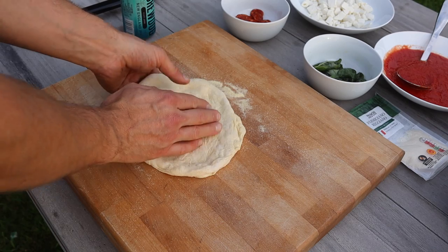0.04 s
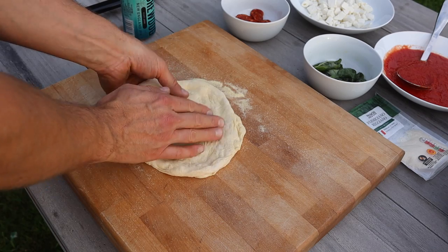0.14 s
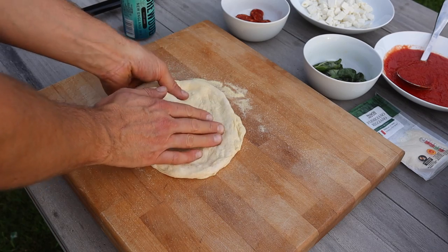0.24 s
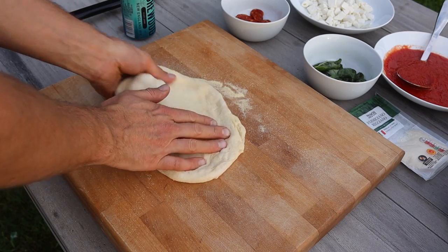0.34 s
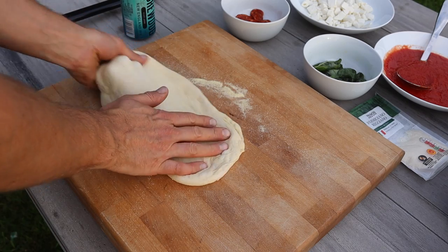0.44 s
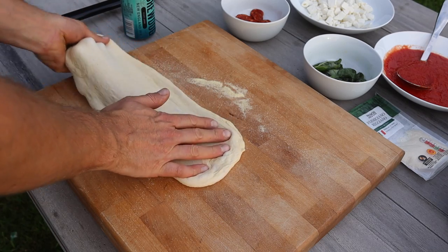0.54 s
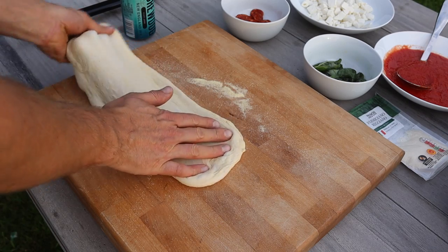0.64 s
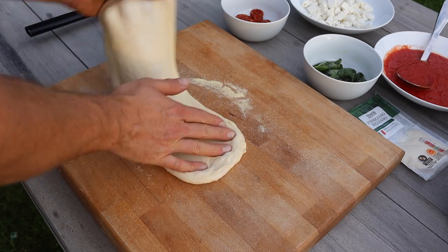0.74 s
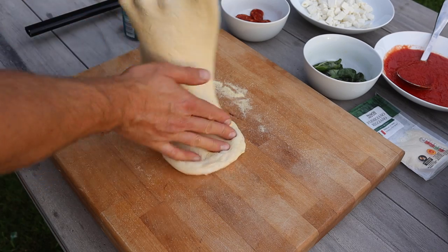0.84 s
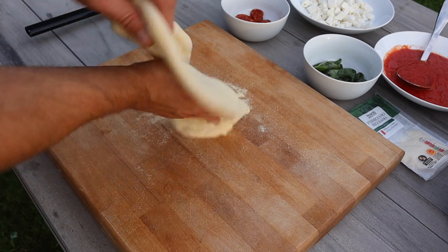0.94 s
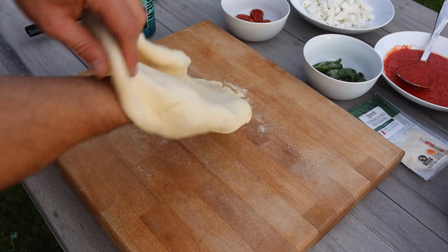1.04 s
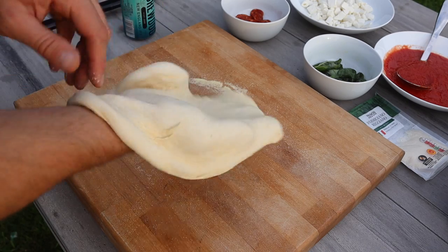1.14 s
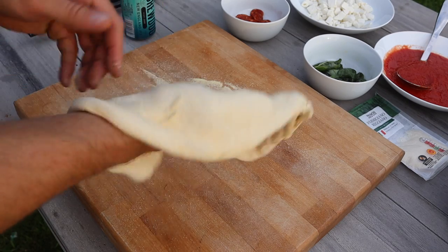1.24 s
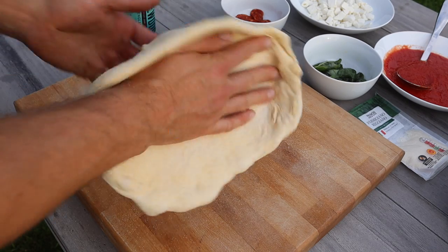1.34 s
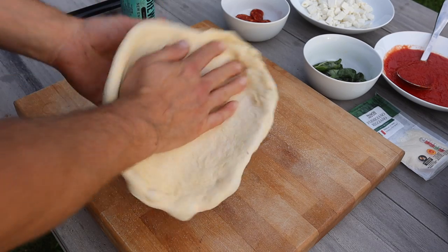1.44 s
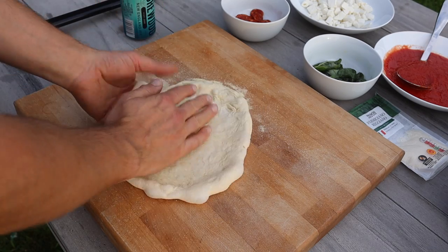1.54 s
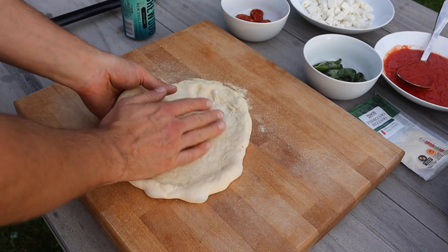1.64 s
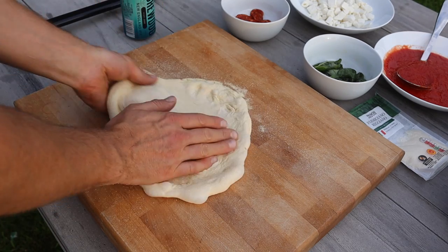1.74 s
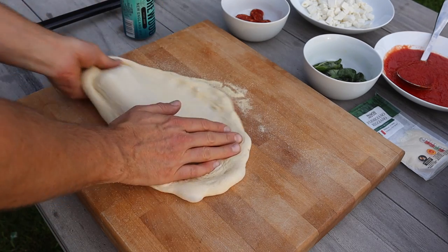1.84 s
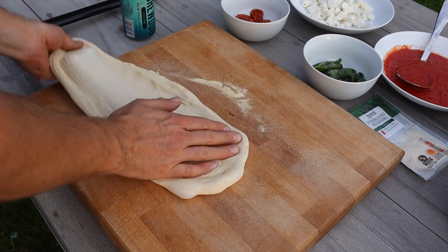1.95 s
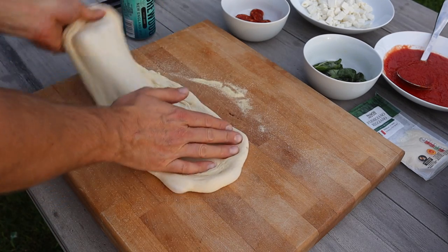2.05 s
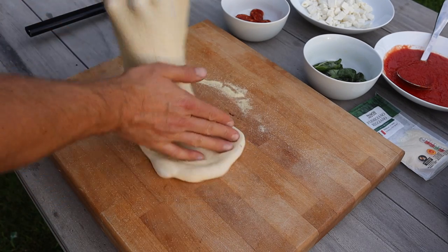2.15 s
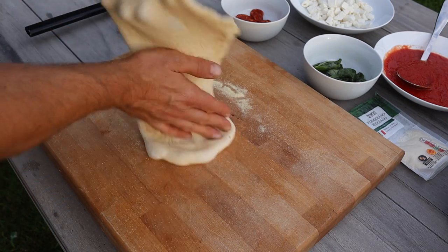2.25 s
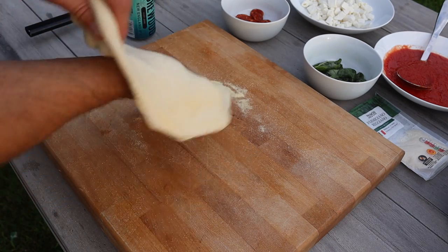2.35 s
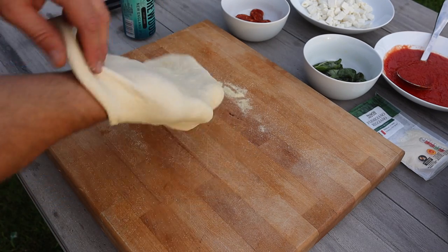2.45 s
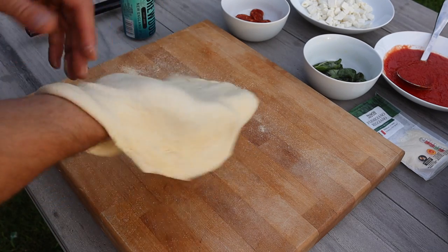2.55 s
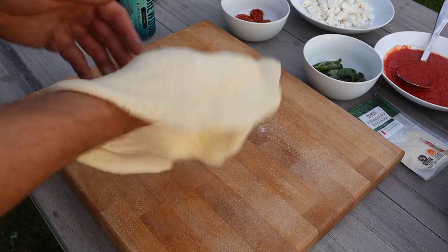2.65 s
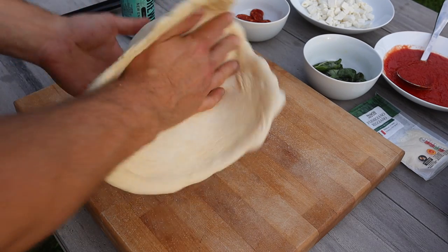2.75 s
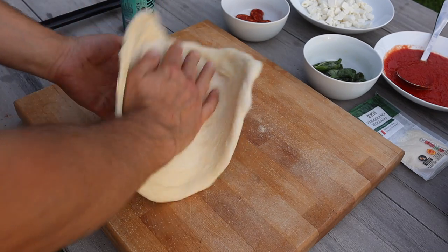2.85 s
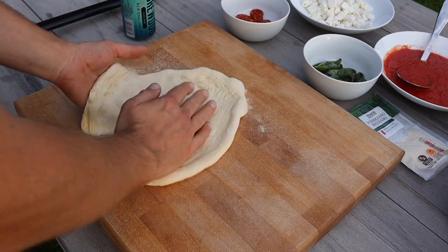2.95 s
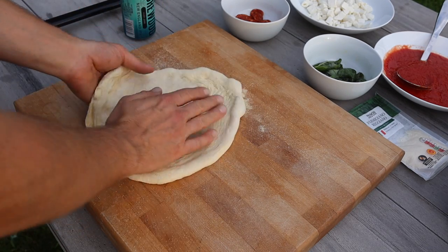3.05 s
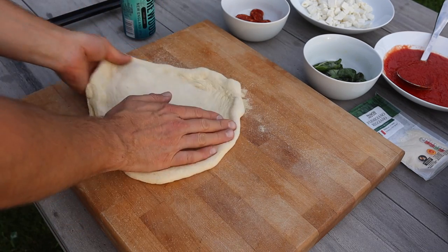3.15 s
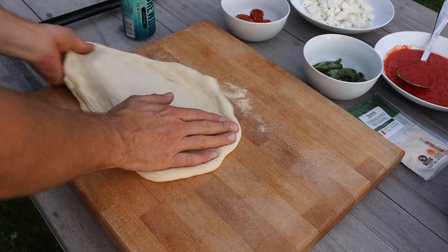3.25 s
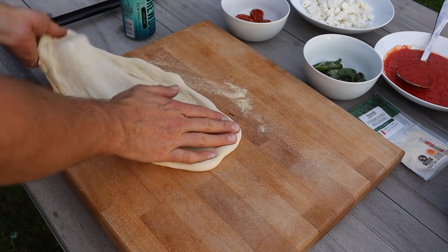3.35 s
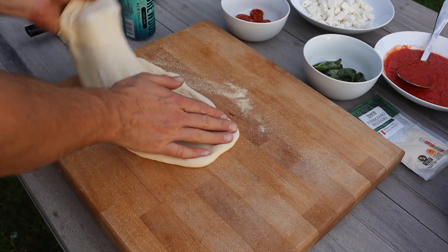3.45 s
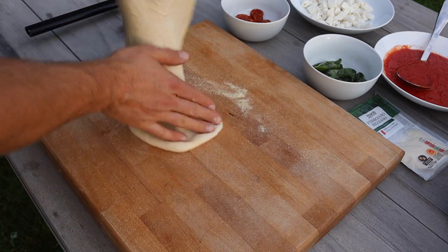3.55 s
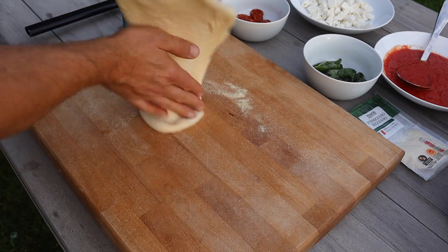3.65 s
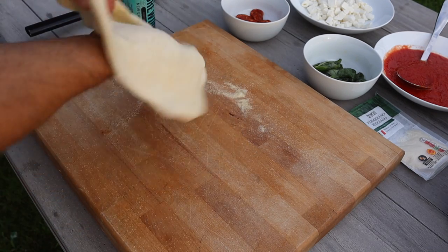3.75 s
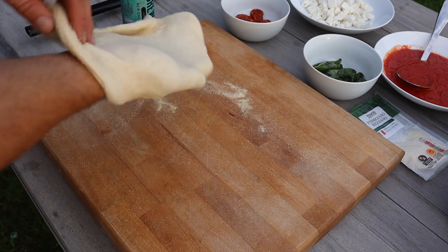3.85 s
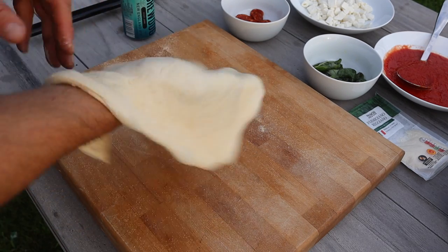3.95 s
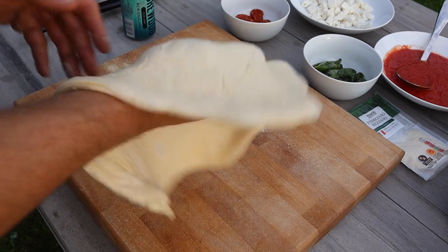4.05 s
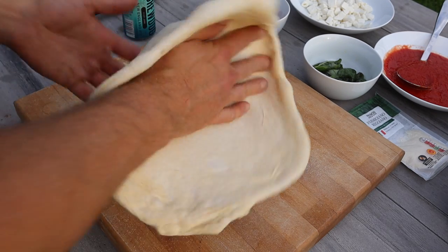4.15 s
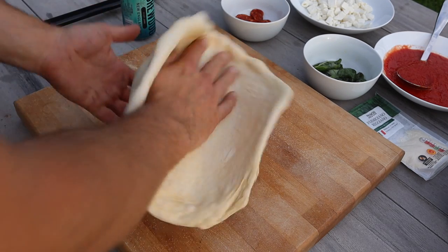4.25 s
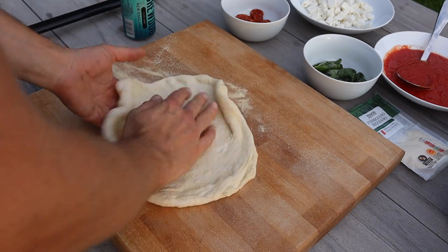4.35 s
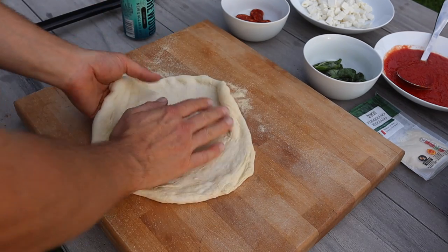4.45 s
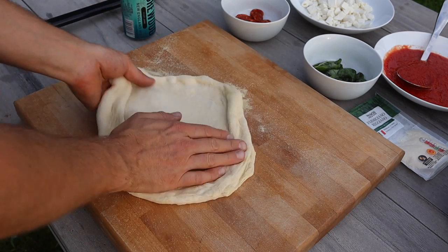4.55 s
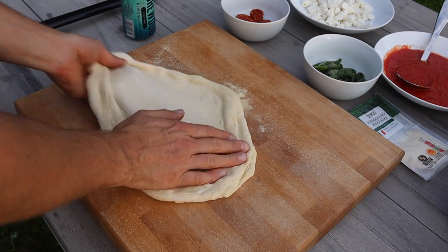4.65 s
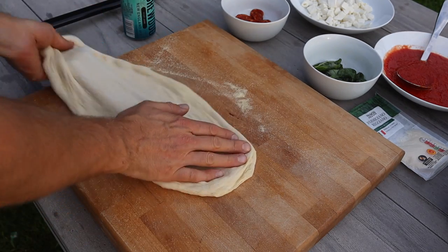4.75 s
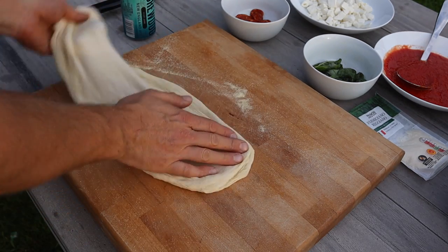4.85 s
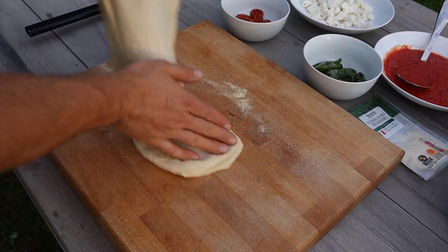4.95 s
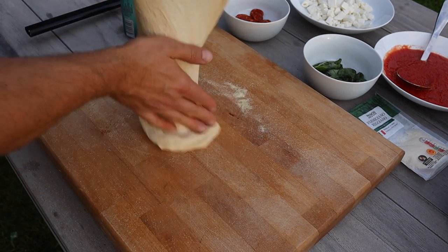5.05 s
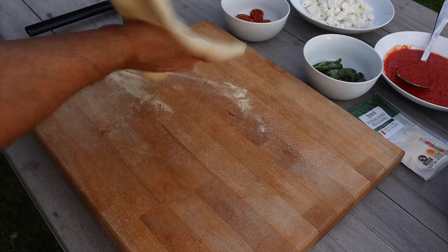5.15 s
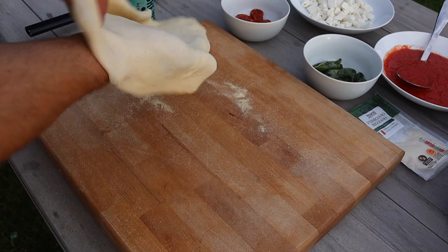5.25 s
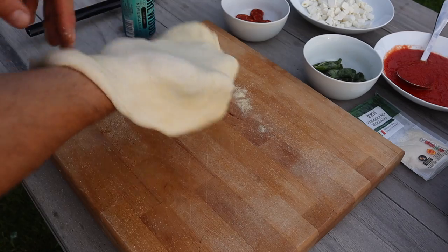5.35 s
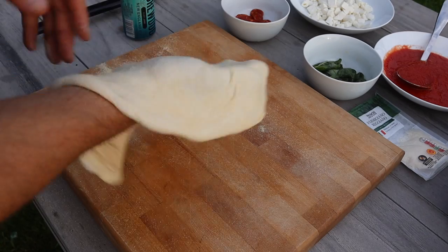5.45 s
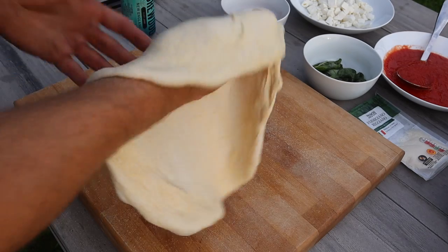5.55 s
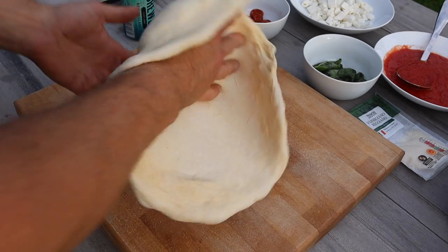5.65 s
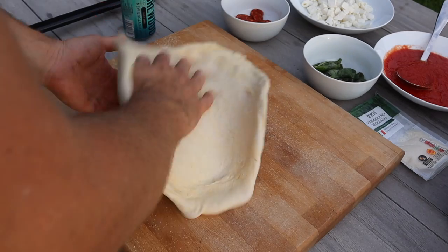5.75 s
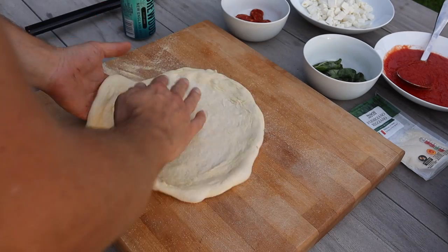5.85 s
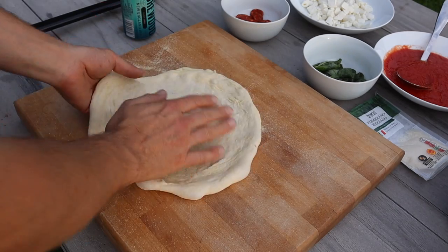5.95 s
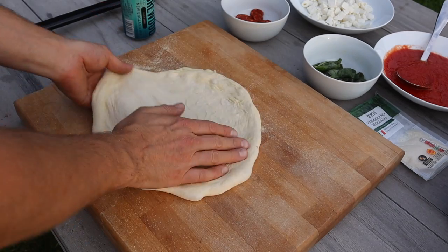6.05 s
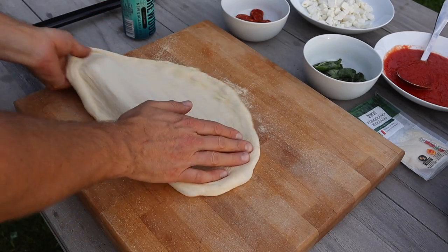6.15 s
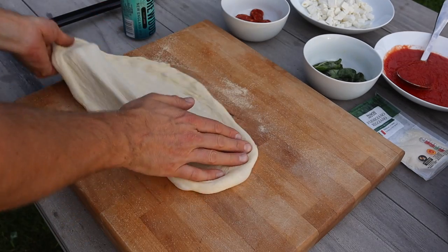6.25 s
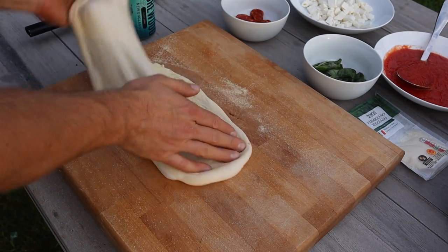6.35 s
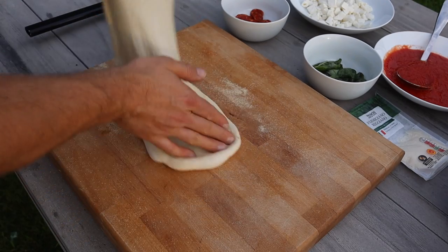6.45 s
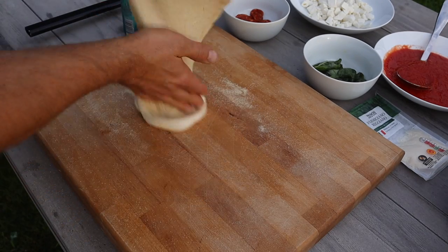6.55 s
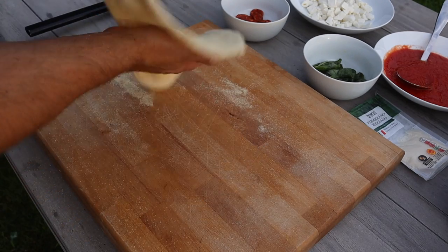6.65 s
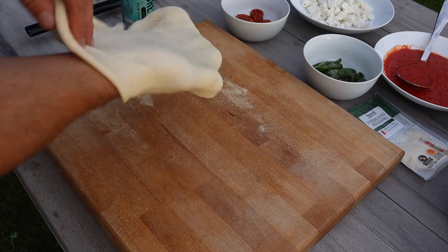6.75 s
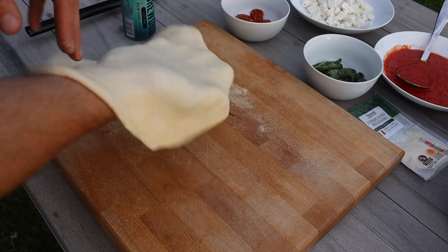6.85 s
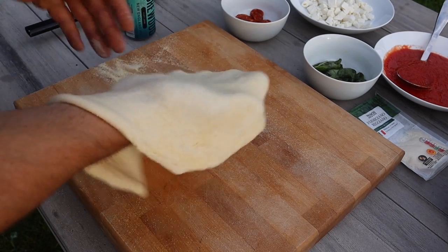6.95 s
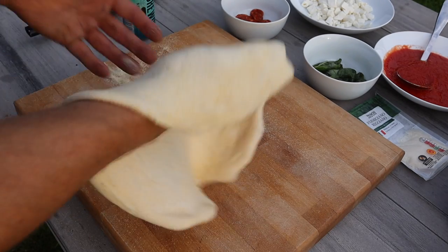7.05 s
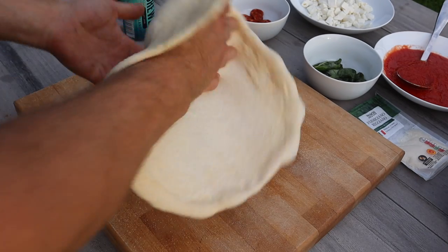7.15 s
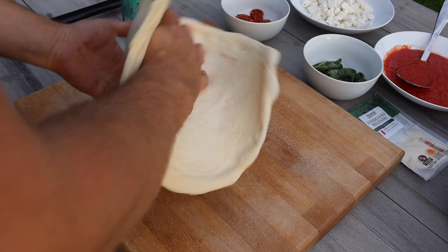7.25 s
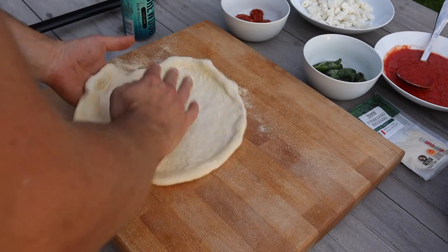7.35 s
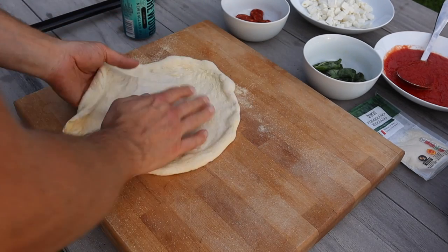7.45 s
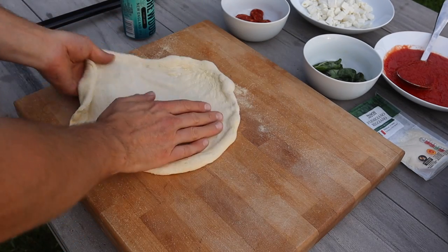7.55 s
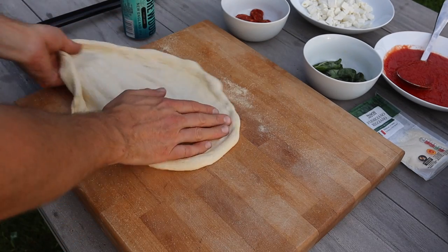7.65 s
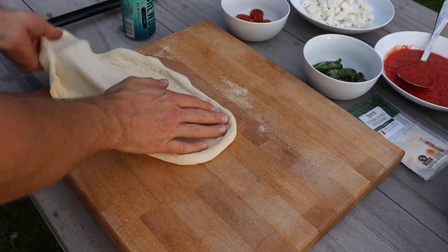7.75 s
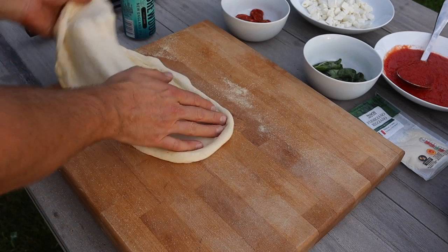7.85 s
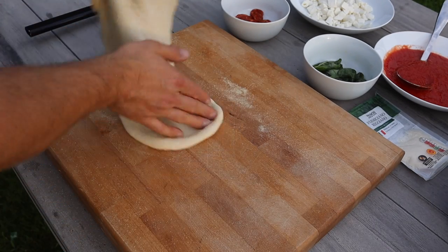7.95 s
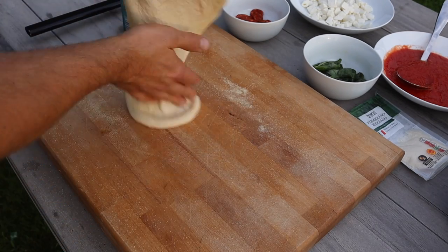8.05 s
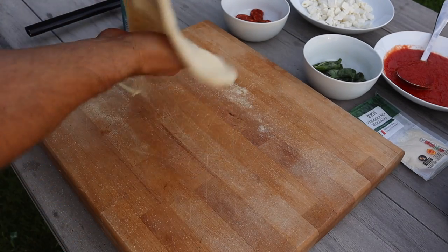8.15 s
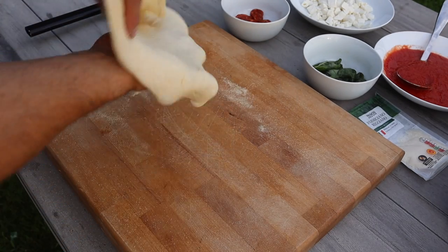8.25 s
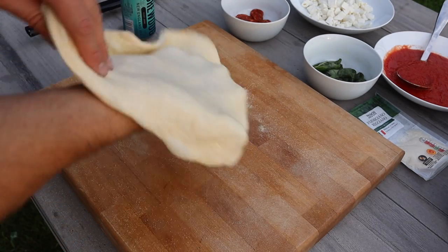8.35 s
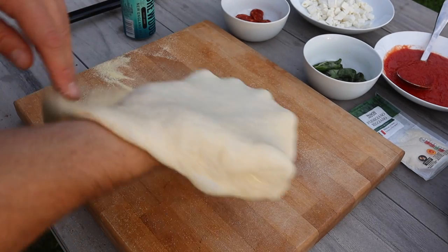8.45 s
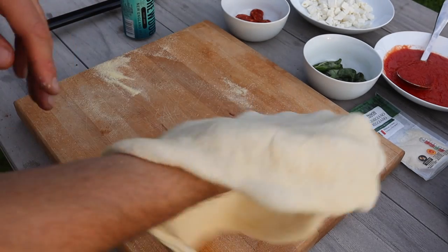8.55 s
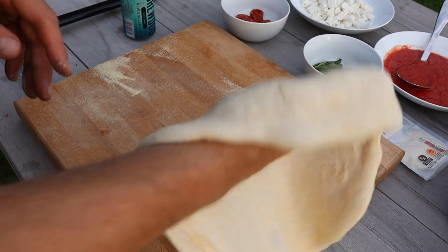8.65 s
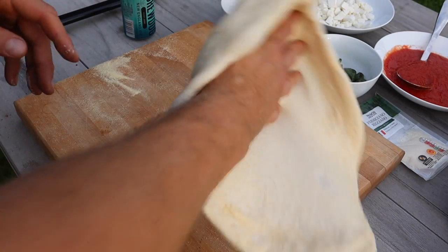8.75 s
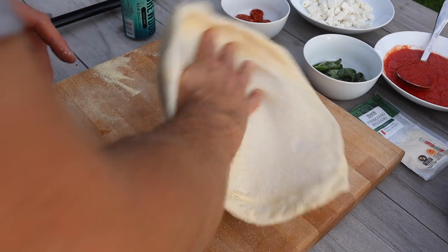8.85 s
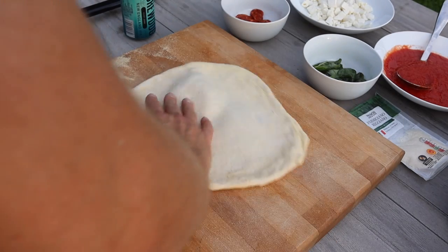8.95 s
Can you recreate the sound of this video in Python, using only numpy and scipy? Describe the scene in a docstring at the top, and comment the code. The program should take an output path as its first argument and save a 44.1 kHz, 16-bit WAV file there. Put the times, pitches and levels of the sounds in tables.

```python
"""A garden table outdoors, close by a two-port recorder: pizza dough is stretched by hand and slapped
six times onto a floured wooden board. On landing the sheet patters (tiny bursts), trapped air pops
(sagging, ringing tones with a crack) and board and table thud (a push, rumble and damped modes).
Between slaps it drags over flour and swishes across skin (filtered grains swelling with each gesture).
A songbird whistles (gliding tones) some way off to the right, over a quiet wash of coloured noise."""
import sys
import numpy as np
from scipy import signal
from scipy.fft import rfft, irfft, next_fast_len
from scipy.io import wavfile

SR = 44100
rng = np.random.default_rng(int(sys.argv[2]) if len(sys.argv) > 2 else 0)


def transcribe(signal):
    """Save signal, clipped to [-1, 1], as a 16-bit WAV file at the path in sys.argv[1]."""
    frames = np.atleast_2d(signal).T
    limited = np.clip(frames, -1, 1)
    pcm = np.round(limited * 32767).astype(np.int16)
    wavfile.write(sys.argv[1], SR, pcm)


N = 396459
T = np.arange(N) / SR
# Table levels are relative; the mix scales them further.


def undb(db):
    """Decibels to gain."""
    return 10 ** (np.asarray(db) / 20)


def unit(x):
    """Scale to rms 1."""
    return x / np.sqrt(np.mean(x ** 2) + 1e-20)


def add(track, s, sound):
    """Mix a sound into a track at time s."""
    i = max(int(s * SR), 0)
    track[..., i:i + sound.shape[-1]] += sound[..., :max(N - i, 0)]


def fade(t, t60):
    """Exponential decay, 60 dB down after t60 seconds."""
    return np.exp(-np.log(1000) * t / t60)


def colour(x, spectrum):
    """Filter by an (f/Hz, level/dB) spectrum, read on a log frequency axis; rms 1."""
    size = next_fast_len(x.shape[-1], real=True)
    hz, db = np.transpose(spectrum)
    f = np.maximum(np.fft.rfftfreq(size, 1 / SR), 1)
    gain = undb(np.interp(np.log(f), np.log(hz), db))
    return unit(irfft(rfft(x, size) * gain, size)[..., :x.shape[-1]])


def walk(rate):
    """Random wander with a spread near 1, heading for a new value rate times a second."""
    knots = rng.standard_normal(4096)
    return np.interp(T * rate, np.arange(len(knots)), knots)


def grains(scatter_db, likeness):
    """Dense tiny contacts of uneven size, partly shared by the two microphone ports."""
    count = 8  # samples of equal size
    sizes = np.repeat(undb(scatter_db * rng.standard_normal(N // count + 1)), count)[:N]
    share = np.clip(likeness, 0, 1)
    common = np.sqrt(share) * rng.standard_normal(N)
    separate = np.sqrt(1 - share) * rng.standard_normal((2, N))
    return unit(sizes * (common + separate))


def pan(x, left_db):
    """Tip a sound towards the left port; left_db is the gain of left over right."""
    return x * undb(np.array([[left_db], [-left_db]]) / 2)


def echoes(x, t60, gap):
    """Scattered reflections of unit energy, building up over gap seconds, different at each port."""
    t = T[:SR]
    response = rng.standard_normal((2, SR)) * fade(t, t60) * (1 - np.exp(-(t / gap) ** 2))
    response = response / np.sqrt(np.sum(response ** 2) / 2)
    return signal.fftconvolve(np.atleast_2d(x), response, axes=1)[:, :N]


def ring(modes):
    """Damped modes, slightly different in pitch for every blow."""
    t = T[:SR // 2]
    total = 0
    for hz, db, t60 in modes:
        struck_hz = hz * (1 + 0.02 * rng.standard_normal())
        total = total + undb(db) * fade(t, t60) * np.sin(2 * np.pi * struck_hz * t)
    return total


def pocket(hz, t60):
    """Trapped air bursts out and rings for a few cycles, sagging in pitch."""
    t = T[:SR // 20]
    sag = 1 + 0.037 * (np.exp(-t / 0.0039) - .5)
    onset = 1 - np.exp(-t / 0.00021)
    return -np.sin(2 * np.pi * hz * np.cumsum(sag) / SR) * fade(t, t60) * onset


# landings of the sheet, the fifth only a faint touch:
# first touch t/s, full contact t/s, laying-down level/dB, contact level/dB, settling t/s
SLAPS = [(1.521, 1.567, -31.5, -21.5, 0.032), (2.887, 2.948, -38.5, -20, 0.067),
         (4.33, 4.372, -31, -28.5, 0.032), (5.799, 5.856, -33, -25.5, 0.056),
         (6.995, 7.01, -41.5, -58, 0.011), (7.350, 7.392, -31, -33, 0.051), (8.943, 8.973, -24, -43, 0.011)]
# crackle of the landing dough: f/Hz, level/dB
PATTER_SPECTRUM = [(100, -15), (350, -4.5), (700, -4), (1100, 1.5), (1700, -2.5), (3000, -3), (5000, -10),
                   (9000, -9.5), (16000, -11.5)]


def patter():
    """The sheet lays itself down in tiny wet pops and crackle, peaking at full contact, then settling."""
    envelope, blisters = np.zeros(N), np.zeros(N)
    for touch, contact, lay_db, contact_db, settle in SLAPS:
        starting = np.clip((T - touch) / 0.0038, 0, 1)
        laying = starting * np.exp(-(np.maximum(T - contact, 0) / settle) ** 2)
        peak = undb(contact_db) * np.exp(-np.abs(T - contact) / 0.0086)
        envelope += laying * (undb(lay_db) + peak)
        # tiny pockets burst one after another, about every 2.8 ms
        for step, (late, pitch, size) in enumerate(rng.standard_normal((50, 3))):
            s = touch + (step + 0.382 * late) * .0028
            strength = np.interp(s, T, envelope) * undb(1.9 * size + 3.5)
            add(blisters, s, strength * pocket(hz=1250 * np.exp(.25 * pitch), t60=0.006))
    contacts = grains(scatter_db=2.5, likeness=.8)
    crackle = colour(contacts, PATTER_SPECTRUM) * envelope * undb(3.5 * walk(rate=300) - 3.5)
    return crackle + blisters


# the largest air pockets bursting under the dough: t/s, level/dB, f/Hz about which it sags, ring t60/s
POPS = [(1.5342, -23, 1100, 0.016), (1.54, -19.5, 1010, 0.015), (1.551, -19, 1130, 0.016),
        (1.5668, -9, 800, 0.015), (1.5701, -14, 540, 0.017), (2.8915, -25, 1010, 0.0065),
        (2.9358, -16, 910, 0.0057), (2.9413, -8.5, 1190, 0.009), (2.9451, -10, 1210, 0.028),
        (2.958, -15.5, 860, 0.0093), (3.838, -27, 714, 0.0072), (4.3632, -21, 1020, .012),
        (4.3689, -16.5, 1440, .010), (4.3734, -17, 1510, 0.017), (5.8046, -15.5, 1010, 0.007),
        (5.8184, -18, 870, 0.011), (5.855, -13.5, 1060, 0.048), (5.8598, -1.5, 1830, 0.0035),
        (5.861, 2, 820, 0.0057), (7.386, -5, 1400, 0.0092), (7.3905, -8.5, 800, 0.0084),
        (7.3972, -10, 850, 0.0095), (7.412, -21, 1060, 0.012), (7.4389, -13.5, 935, 0.0098),
        (8.9765, 10, 1126, 0.0057), (8.9815, -4.5, 614, 0.037)]
# crack of a bursting air pocket: f/Hz, level/dB
CRACK_SPECTRUM = [(100, -12), (350, 1.5), (700, 2.5), (1100, -9.5), (1700, -0.5), (3000, -1.5),
                  (5000, -13.5), (8000, -17), (16000, -36)]


def pops():
    """The big air pockets ring, each with a crack as its rim bursts."""
    out, t = np.zeros((2, N)), T[:SR // 20]
    for s, db, hz, t60 in POPS:
        burst = rng.standard_normal(len(t)) + .3 * rng.standard_normal((2, len(t)))
        crack = colour(burst, CRACK_SPECTRUM) * fade(t, t60=0.0047)
        add(out, s, undb(db) * (1.04 * pocket(hz, t60) + undb(-12.0) * crack))
    return out


# dough or palm comes down on the board: t/s, ringing level/dB, blunt push level/dB
THUDS = [(1.5704, -39, -19.5), (1.991, -60, -48), (2.952, -40.5, -25), (3.055, -57, -39), (3.84, -58, -38),
         (4.372, -43.5, -38), (4.439, -54, -37), (5.8612, -37.5, -10.5), (7.390, -35.5, -22),
         (7.44, -40.5, -21), (7.617, -53, -40), (8.982, -41, -12)]
# rumble of the landing: f/Hz, level/dB
THUD_SPECTRUM = [(30, -30), (70, -9), (100, 7), (200, 10), (350, 5), (600, -17), (1200, -34), (3000, -58),
                 (10000, -42)]
# modes of board and table: nominal f/Hz, level/dB, t60/s
BOARD_MODES = [(100.4, 5, 0.44), (121, -23, .3), (155.6, -34, 0.14), (220, -9, 0.32), (244, -2, 0.42),
               (342, 10, 0.15), (411, 9, 0.089)]


def thuds():
    """A soft, heavy landing pushes the air bluntly once and sets board and table ringing."""
    out, t = np.zeros((2, N)), T[:SR // 2]
    push = np.sin(2 * np.pi * 310 * t) * fade(t, t60=0.01)
    for s, ring_db, push_db in THUDS:
        noise = rng.standard_normal(len(t)) + 0.046 * rng.standard_normal((2, len(t)))
        rumble = colour(noise, THUD_SPECTRUM) * fade(t, t60=0.37)
        ringing = undb(-3.0) * rumble + undb(-8) * ring(BOARD_MODES)
        add(out, s, undb(ring_db) * ringing + undb(push_db) * push)
    return out


STROKE_SHAPE = 1.8  # 1 = pointed, 2 = bell-shaped


def stroke(at, rise, fall):
    """A movement that speeds up to its fastest moment and slows again."""
    distance = np.maximum((at - T) / rise, (T - at) / fall)
    return np.exp(-(distance ** STROKE_SHAPE).clip(0, 20))


PRESS_RAMP_S = 0.031


def held(start, end):
    """A steady contact that eases in and out."""
    return np.clip(np.minimum(T - start, end - T) / PRESS_RAMP_S + .5, 0, 1)


# the dough is pulled long under the palm:
# fastest sliding t/s, rise t/s, fall t/s, level/dB, groan of the stretching dough level/dB
PULLS = [(0.46, .08, 0.17, -52.5, -47.5), (1.881, .125, 0.16, -45.5, -45), (3.335, 0.11, 0.065, -44.5, -50),
         (4.76, 0.14, 0.12, -45, -49.5), (6.22, 0.086, 0.089, -46.5, -53), (7.72, 0.13, 0.077, -47.5, -55)]
# the palm rests on the dough and rubs it flat: start t/s, end t/s, level/dB
PRESSES = [(0.358, 0.597, -55.5), (1.573, 2.01, -56.5), (2.948, 3.4, -54), (4.556, 4.86, -60),
           (6.005, 6.45, -55), (7.41, 7.78, -51.5)]
# the sheet is drawn up off the flour: fastest sliding t/s, rise t/s, fall t/s, level/dB
LIFTS = [(0.95, 0.11, 0.062, -45.5), (2.30, 0.16, 0.15, -43), (3.58, 0.14, 0.11, -46.5),
         (5.05, 0.14, 0.068, -41.5), (6.54, 0.13, .14, -41.5), (8.04, 0.14, 0.088, -43)]
# its rim scuffs the board: t/s, rise t/s, fall t/s, level/dB
SCUFFS = [(.5, .11, 0.15, -50), (1.11, .04, .03, -48), (1.765, 0.023, 0.036, -52),
          (2.38, 0.067, 0.039, -40.5), (3.25, 0.04, 0.026, -47.5), (3.66, 0.15, 0.087, -48),
          (3.875, 0.045, .025, -47.5), (4.44, 0.013, .02, -44), (5.329, 0.033, 0.013, -45.5),
          (6.64, 0.043, 0.031, -40), (6.8, .03, .04, -44.5), (7.005, 0.011, 0.04, -39),
          (7.065, .03, .025, -44.5), (8.1, 0.043, 0.053, -48)]
# it brushes over hand and forearm: t/s, rise t/s, fall t/s, level/dB, extra finest hiss level/dB
BRUSHES = [(0.16, .06, 0.1, -61.5, 2), (1.085, 0.11, 0.088, -45, 2), (1.27, 0.039, 0.035, -51, -4),
           (2.47, 0.038, 0.047, -45.5, 0), (2.565, .05, .025, -52.5, 6), (3.755, 0.087, 0.062, -46.5, 2),
           (3.85, 0.04, 0.064, -45, 5), (4.01, 0.068, 0.15, -56, 3.5), (4.44, 0.09, 0.038, -46.5, -2),
           (4.555, 0.018, 0.036, -55, 11), (5.16, .04, 0.046, -53, 3), (5.22, 0.027, 0.066, -46, -1),
           (5.32, 0.055, 0.064, -48, 4), (5.42, 0.055, 0.038, -47, 3.5), (5.51, 0.059, 0.057, -47, 1),
           (6.68, 0.044, 0.16, -51.5, 7), (6.819, 0.032, 0.022, -41.5, 6.5), (6.92, 0.053, 0.043, -49.5, 4),
           (7.01, .015, .03, -49, -1), (7.065, .025, .022, -49.5, -1), (8.12, .04, 0.029, -53, 5),
           (8.194, .004, 0.05, -53, 1), (8.255, 0.031, .04, -51.5, -4), (8.42, 0.099, .05, -45.5, 3.5),
           (8.455, .04, .025, -43.5, 11), (8.54, 0.06, 0.028, -49, -2)]
# it slides off the arm on its way down: t/s, rise t/s, fall t/s, level/dB
SLIDES = [(1.425, 0.096, 0.063, -44), (2.88, 0.1, 0.06, -47), (4.225, 0.054, 0.18, -45),
          (5.79, 0.13, .04, -48.5), (7.265, 0.027, 0.089, -51), (8.76, .06, 0.084, -55.5),
          (8.895, 0.054, 0.055, -43)]
# colour of each gesture against its flour hiss:
# drag on the board level/dB, skin rasp level/dB, finest hiss level/dB
CREEP_MIX = (2.2, -0.92, -9)
PRESS_MIX = (2.9, -1, -.5)
PULL_MIX = (1.15, 2.1, -0.34)
LIFT_MIX = (-2, -3, -1.1)
BRUSH_MIX = (-8.5, -0.98, 0)
SLIDE_MIX = (-16.5, -3, -3.4)
HOLD_MIX = (-2, -2, -2.1)
HOLD_DB = -63.5  # the fingers never lie quite still on the dough
CREEP_DB = -62  # from each press until it is lifted, the dough creeps on the board


def rub(envelope, db, drag_db, rasp_db, fine_db):
    """Power that one gesture gives to the four kinds of friction."""
    levels_db = db + np.array([[0], [drag_db], [rasp_db], [fine_db]])
    return undb(levels_db) ** 2 * envelope ** 2


def gestures():
    """Strength of flour hiss, board drag, skin rasp and finest hiss over time; gestures add in power."""
    power = rub(np.ones(N), HOLD_DB, *HOLD_MIX)
    for (start, end, db), (lifted, *_) in zip(PRESSES, LIFTS):
        pressing = rub(held(start, end), db, *PRESS_MIX)
        creeping = rub(held(start, lifted), CREEP_DB, *CREEP_MIX)
        power += pressing + creeping
    for table, mix in (PULLS, PULL_MIX), (LIFTS, LIFT_MIX), (SLIDES, SLIDE_MIX):
        for at, rise, fall, db, *_ in table:
            power += rub(stroke(at, rise, fall), db, *mix)
    drag_db, rasp_db, brush_fine_db = BRUSH_MIX
    for at, rise, fall, db, fine_db in BRUSHES:
        power += rub(stroke(at, rise, fall), db, drag_db, rasp_db, brush_fine_db + fine_db)
    for at, rise, fall, db in SCUFFS:
        power[1] += (undb(db) * stroke(at, rise, fall)) ** 2  # board drag only
    return np.sqrt(power)


# spectra of board drag, stretching groan, skin rasp, flour hiss and finest hiss: f/Hz, level/dB
DRAG_SPECTRUM = [(300, -26), (700, -9), (900, -2.5), (1060, 1), (1260, 1), (1500, -2.5), (1900, -4),
                 (2500, -12), (3500, -23), (9000, -44)]
GROAN_SPECTRUM = [(150, -37), (400, -6), (580, 8.5), (760, -2), (1100, -13), (1600, -33), (2200, 0.5),
                  (3000, -6.5), (5000, -38)]
RASP_SPECTRUM = [(600, -13.5), (1400, -2), (2200, 0), (3000, 1), (4000, -3), (5200, -13.5), (9000, -40)]
HISS_SPECTRUM = [(2500, -20), (4000, -1.5), (5200, 0.5), (6800, 1), (9500, -2.5), (12000, -6.5),
                 (16000, -13)]
FINE_SPECTRUM = [(5000, -27), (9000, -6), (12000, -1), (16000, -2.5)]
GROAN_S = 0.077  # rise and fall time of the groan in a pull
SLIP_DB, SLIP_PER_S = 1.27, 24  # each kind of friction catches and eases on its own


def handling():
    """Dough sticks and slips on flour: the board answers mid-range, skin rasps and flour hisses above."""
    hissing, dragging, rasping, sifting = (
        strength * undb(SLIP_DB * walk(rate=SLIP_PER_S)) for strength in gestures())
    groaning = sum(undb(db) * stroke(at, GROAN_S, GROAN_S) for at, *_, db in PULLS)
    slip_db = 1.0 * walk(rate=94)  # unevenness common to all of them
    drag = colour(grains(scatter_db=3, likeness=0.86), DRAG_SPECTRUM) * dragging
    drag = drag * undb(0.37 * walk(rate=150))
    groan = colour(grains(scatter_db=3, likeness=0.88), GROAN_SPECTRUM) * groaning
    rasp = colour(grains(scatter_db=0.5, likeness=0.51), RASP_SPECTRUM) * rasping
    hiss = colour(grains(scatter_db=-1.5, likeness=0.11), HISS_SPECTRUM) * hissing
    fine = colour(grains(scatter_db=2, likeness=0.05), FINE_SPECTRUM) * sifting
    return (pan(drag + groan, left_db=3.0) + pan(rasp + hiss + fine, left_db=1.5)) * undb(slip_db)


# small sticky ticks of dough leaving skin: t/s, level/dB
TICKS = [(0.095, -40.5), (1.029, -31.5), (1.6687, -44), (4.4416, -34), (4.5356, -52), (5.884, -30.5),
         (6.7294, -39), (6.757, -38), (8.612, -44), (8.685, -45), (8.7246, -53)]
# spectrum of a sticky tick: f/Hz, level/dB
TICK_SPECTRUM = [(700, -18), (2000, 2), (4000, 8), (10000, -1), (16000, -12)]
# the dough flops hollowly onto the forearm: t/s, level/dB
FLOPS = [(6.818, -31)]
# modes of its cupped hollow: nominal f/Hz, level/dB, t60/s
HOLLOW_MODES = [(391, 0.5, 0.11), (1190, -12, .06), (1640, 2, 0.052)]


def touches():
    """Sticky noise ticks and a soft hollow ring while the dough is passed from hand to arm."""
    out, t = np.zeros((2, N)), T[:SR // 2]
    for s, db in TICKS:
        tick = colour(rng.standard_normal((2, len(t))), TICK_SPECTRUM) * fade(t, t60=0.008)
        add(out, s, undb(db + 1.5) * tick)
    for s, db in FLOPS:
        add(out, s, undb(db) * ring(HOLLOW_MODES) * (1 - np.exp(-t / 0.0026)))
    return out


# bird whistles before flutter:
# t/s, length t/s, starting f/Hz, middle f/Hz, final f/Hz, level/dB, trill depth f/Hz
WHISTLES = [(0, 0.064, 2650, 2600, 2580, -62, 60), (0.148, 0.19, 2300, 2130, 2230, -50.5, 80),
            (.34, 0.08, 2680, 2570, 2460, -55, 125), (0.424, 0.34, 2900, 3114, 3220, -55, 343),
            (0.542, 0.17, 1950, 1870, 1840, -62, 40), (2.783, 0.13, 2380, 2330, 2370, -58.5, 60),
            (4.487, 0.24, 1860, 1992, 1877, -50.5, 40), (4.897, 0.21, 2210, 2465, 2410, -45.5, 57),
            (5.192, 0.16, 3680, 3675, 3850, -49.5, 90), (5.269, 0.11, 1500, 1610, 1830, -53.5, 151),
            (5.399, 0.12, 2370, 2410, 2543, -43, 53), (7.47, 0.26, 1740, 1846, 1906, -52, 100),
            (7.701, .12, 2400, 2374, 2165, -52.5, 134), (7.751, 0.17, 1880, 1620, 1604, -53.5, 100),
            (8.207, 0.05, 2350, 2360, 2360, -54.5, 25), (8.264, 0.22, 1620, 1846, 2050, -53, 244),
            (8.405, 0.155, 2367, 2352, 2370, -41.5, 30), (8.664, 0.09, 4400, 4180, 3940, -57, 490),
            (8.67, .15, 2900, 2800, 2870, -59, 490)]
BIRD_LAG = 7  # samples by which the direct song reaches the left port later


def bird():
    """Gliding, fluttering whistles from the right, smeared by the gardens they cross."""
    song, flutter = np.zeros(N), walk(rate=260)
    for s, length, start_hz, middle_hz, end_hz, db, trill_hz in WHISTLES:
        u = np.linspace(0, 1, int(length * SR))
        glide = np.polyval(np.polyfit([0, .5, 1], [start_hz, middle_hz, end_hz], 2), u)
        hz = glide + trill_hz * np.roll(flutter, -int(s * SR))[:len(u)]
        swell = np.sqrt(2 * np.minimum(1, np.minimum(u / 0.11, (1 - u) / 0.24)))
        add(song, s, undb(db) * swell * np.sin(2 * np.pi * np.cumsum(hz) / SR))
    song = song * undb(1.0 * walk(rate=71))
    direct = np.array([np.pad(song, (BIRD_LAG, 0))[:N], song])
    near_smear = undb(0.5) * echoes(song, t60=0.18, gap=0.0027)
    far_smear = undb(-3.5) * echoes(song, t60=0.64, gap=0.027)
    return pan(undb(7) * direct + near_smear + far_smear, left_db=-3)


# distant outdoor wash: f/Hz, level/dB
GARDEN_SPECTRUM = [(20, 5), (50, 1), (110, 1), (220, 1.5), (330, -0.5), (480, -1.5), (700, -4),
                   (1300, -10.5), (3000, -11), (6000, -16), (16000, -27)]
# faint far-off tones: start t/s, end t/s, centre f/Hz, level/dB, left minus right level/dB
DRONES = [(0, 11, 486.5, -73.5, 17.5), (5.29, 5.38, 860, -54, -13), (6.91, 7.03, 860, -53.5, 0)]
GARDEN_DB = -54


def garden():
    """A faint, slowly swelling wash of distant outdoor noise with a few wavering tones in it."""
    wash = colour(grains(scatter_db=1, likeness=0.82), GARDEN_SPECTRUM)
    out = wash * undb(GARDEN_DB + 3.1 * walk(rate=2.214))
    for start, end, hz, db, left_db in DRONES:
        wavering_hz = hz * (1 + 0.0194 * walk(rate=60))
        tone = np.sin(2 * np.pi * np.cumsum(wavering_hz) / SR)
        present = np.clip(np.minimum(T - start, end - T) / 0.033, 0, 1)
        out = out + pan(tone * present * undb(db + 2 * walk(rate=13.0)), left_db)
    return out


PORT_LAG = 2  # samples


def scene():
    """Slaps close by, with quick reflections from table and body and a faint tail from the surroundings."""
    slaps = pan(patter() + pops(), left_db=2.5) + pan(thuds(), left_db=2.0)
    near = undb(-11.5) * echoes(slaps, t60=0.055, gap=0.00037)
    far = undb(-27.0) * echoes(slaps, t60=1.0, gap=.015)
    left, right = slaps + near + far + handling() + touches() + garden()
    # the board lies a little to the left, so its sound reaches the right port later
    return np.array([left, np.pad(right, (PORT_LAG, 0))[:N]]) + bird()


LOW_HZ, TOP_HZ = 62, 15750


def record(dry):
    """The recorder thins the deep bass, clips at full scale and cuts the top."""
    bass_cut = signal.butter(2, LOW_HZ, "high", fs=SR, output="sos")
    top_cut = signal.ellip(10, .2, 80, TOP_HZ, fs=SR, output="sos")
    thinned = signal.sosfilt(bass_cut, dry)
    return signal.sosfilt(top_cut, np.clip(thinned, -1, 1))


dry = scene()
out = record(dry)
transcribe(out)
```